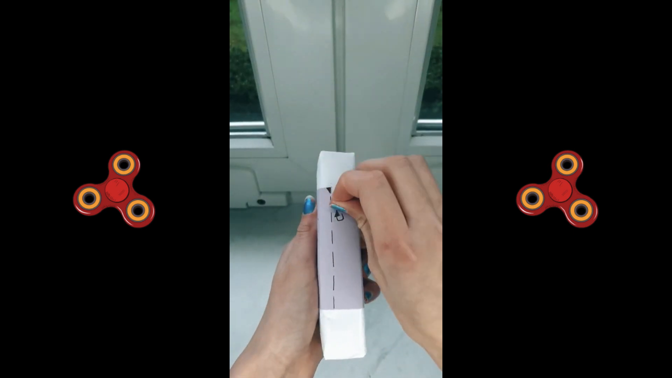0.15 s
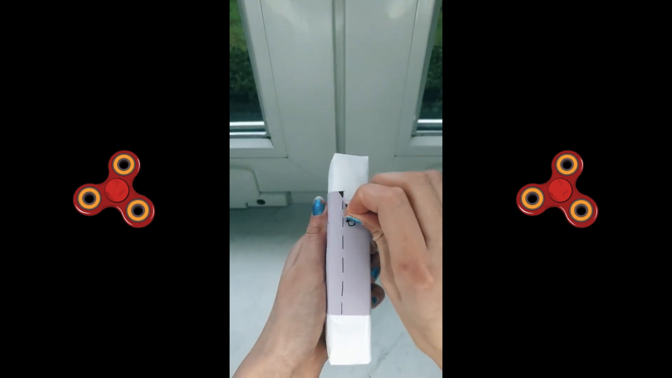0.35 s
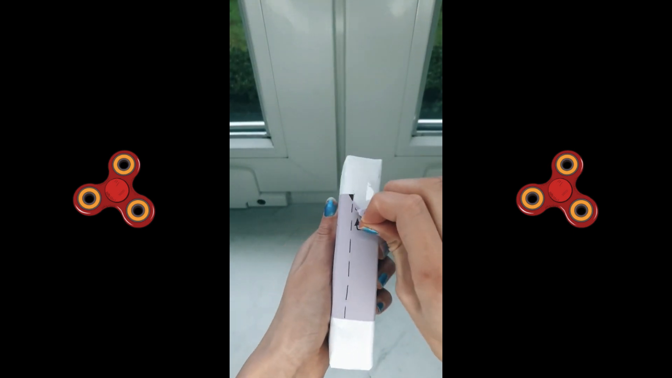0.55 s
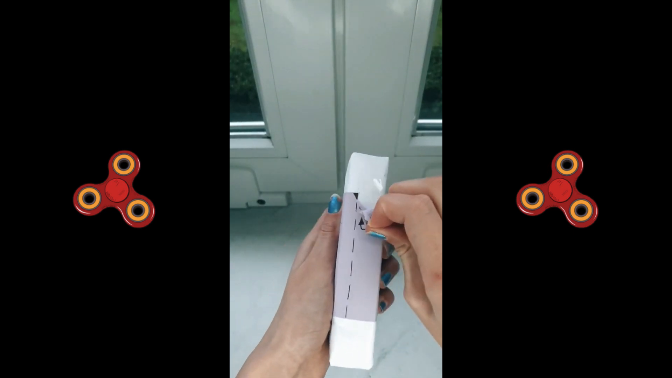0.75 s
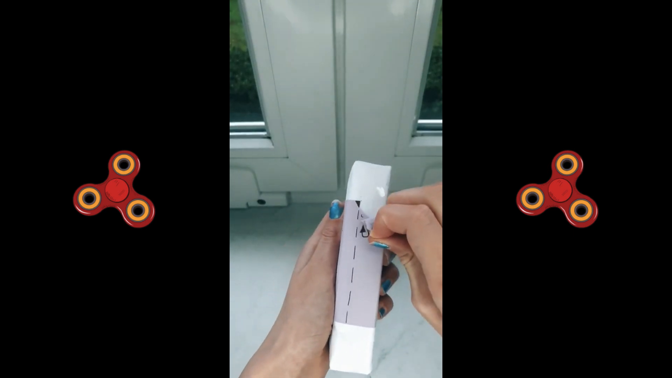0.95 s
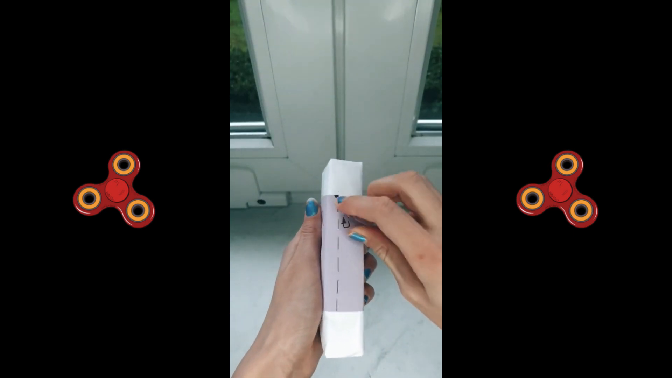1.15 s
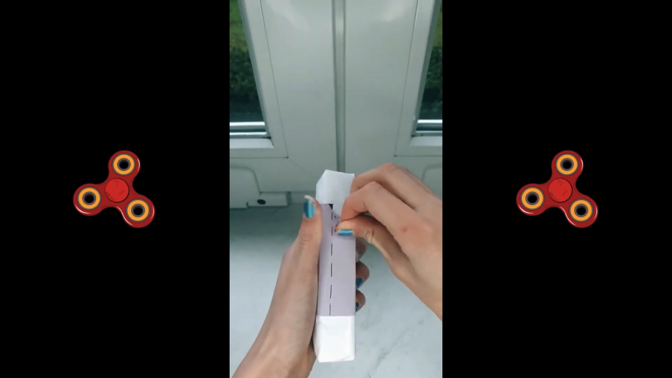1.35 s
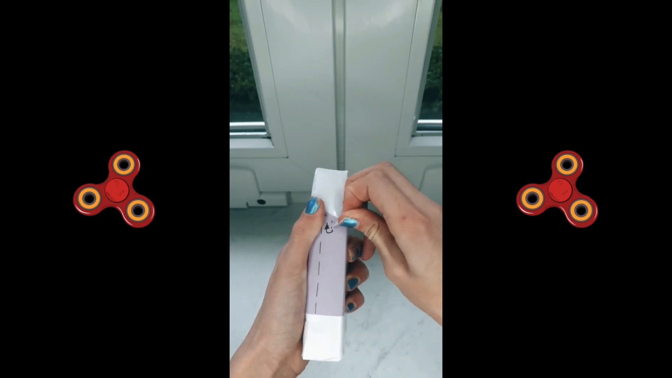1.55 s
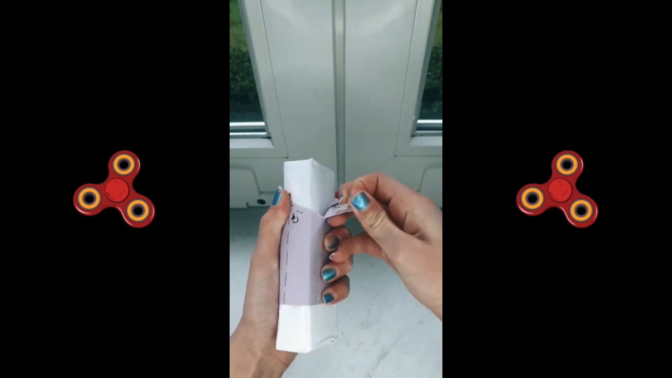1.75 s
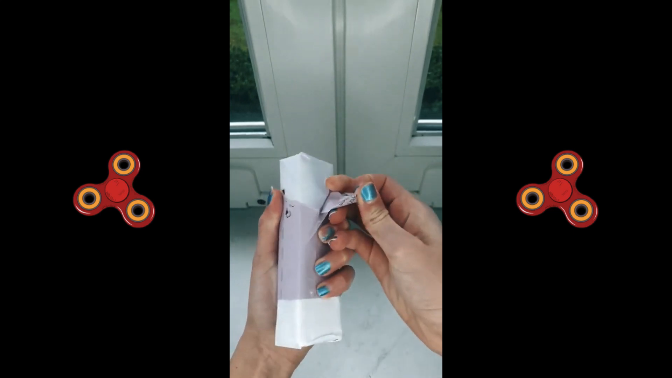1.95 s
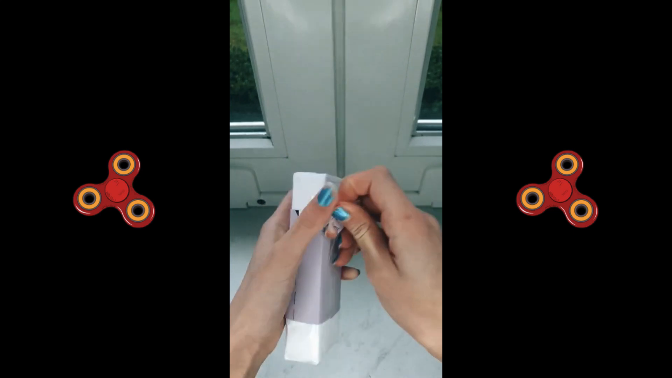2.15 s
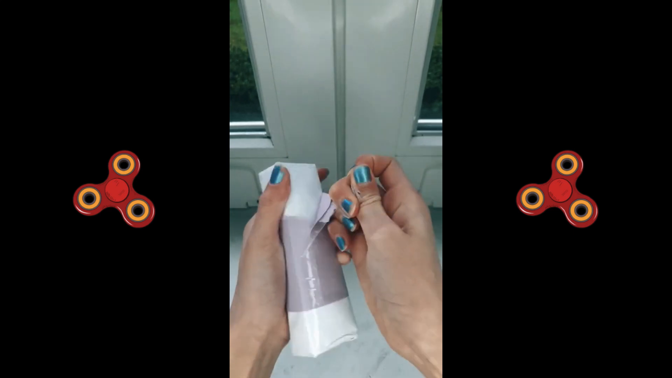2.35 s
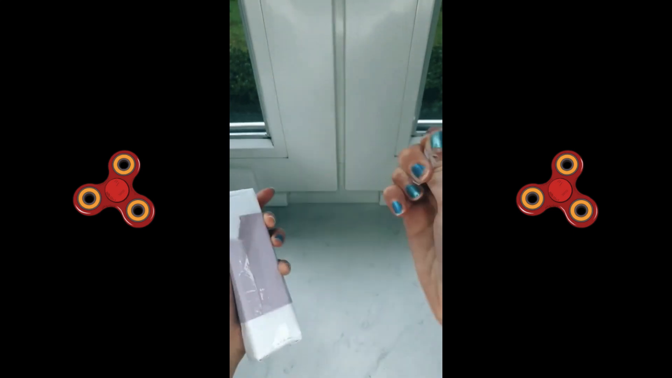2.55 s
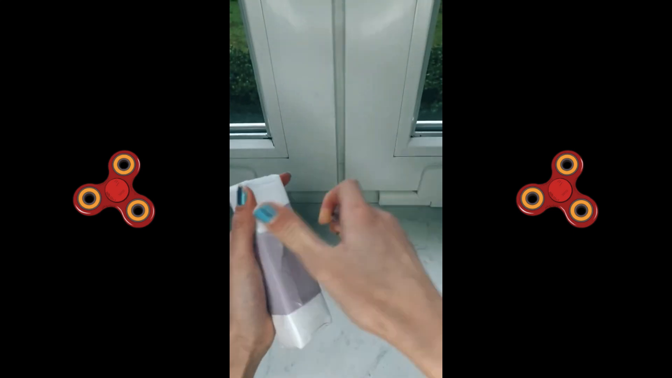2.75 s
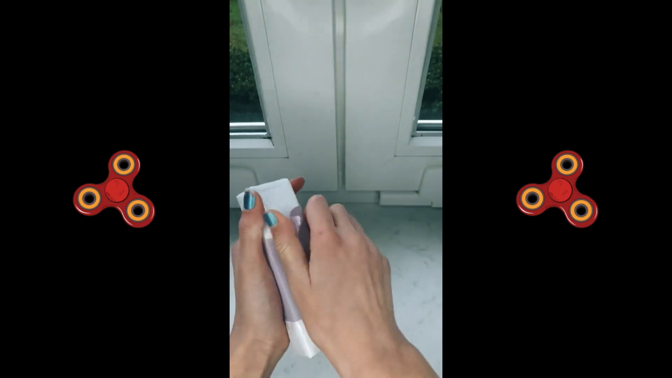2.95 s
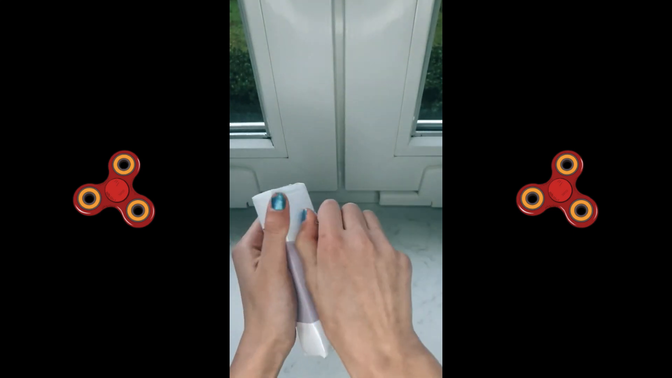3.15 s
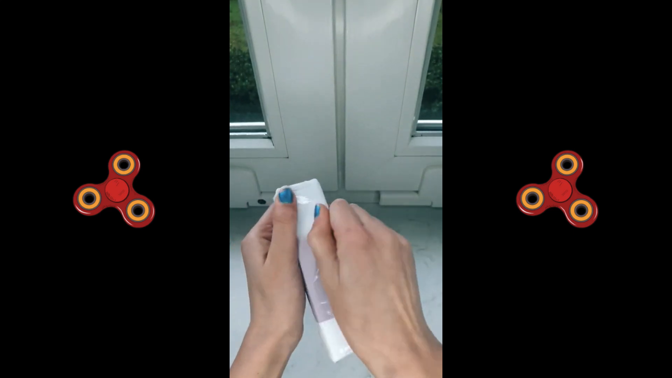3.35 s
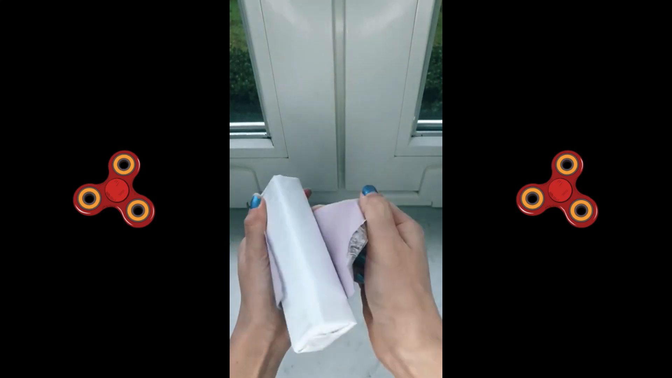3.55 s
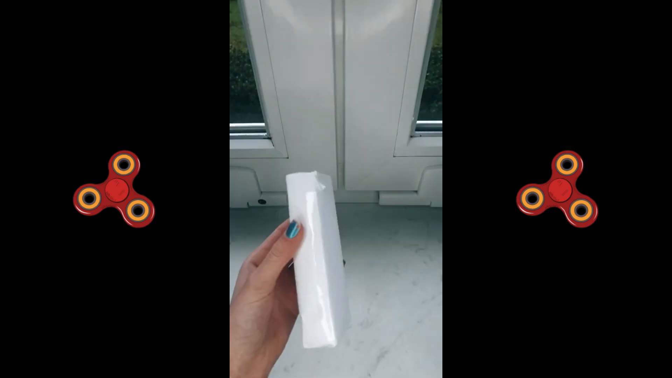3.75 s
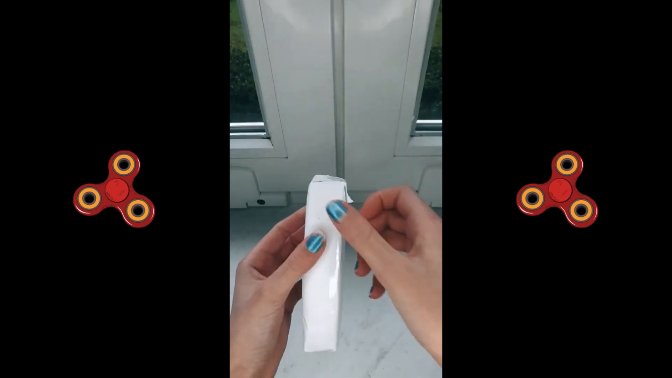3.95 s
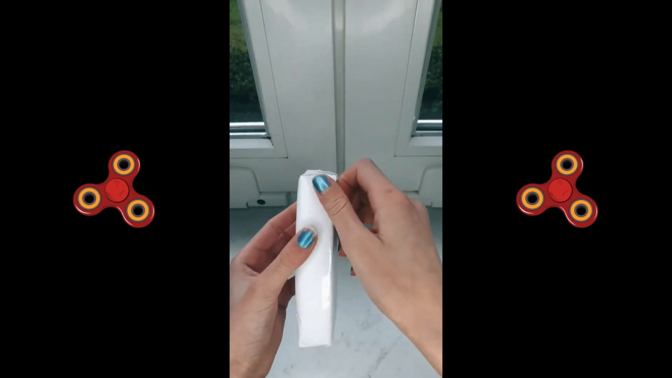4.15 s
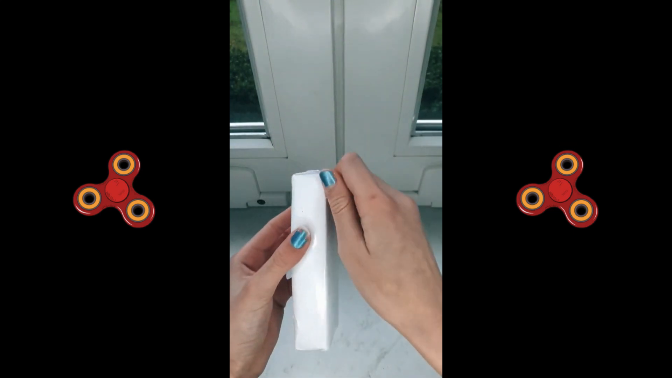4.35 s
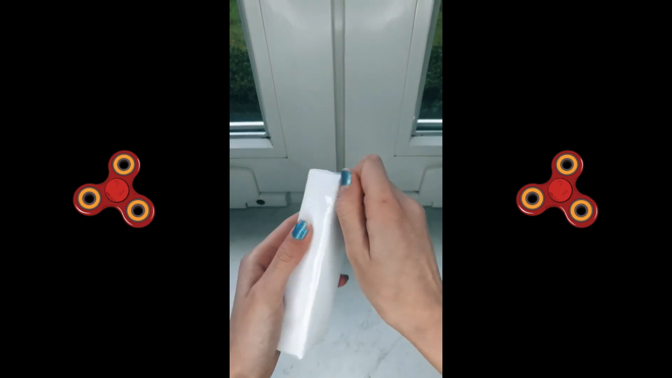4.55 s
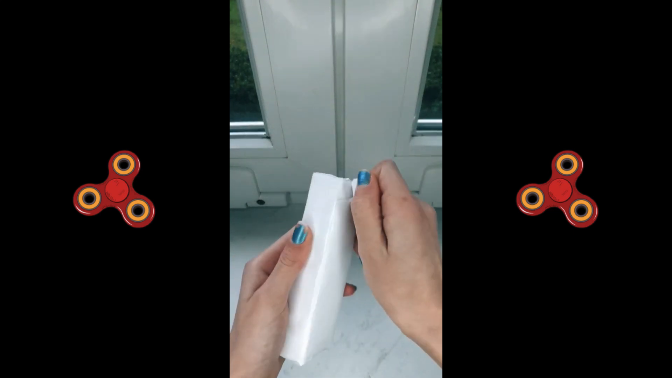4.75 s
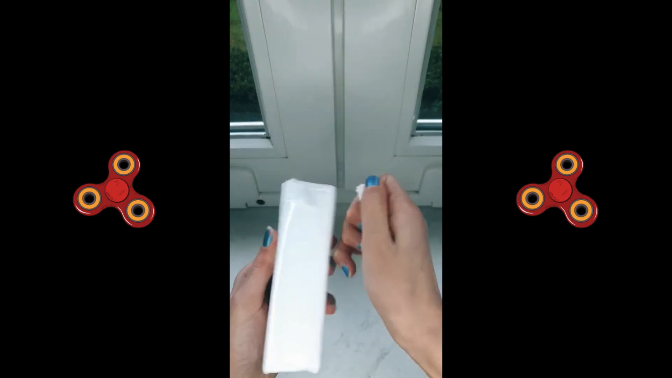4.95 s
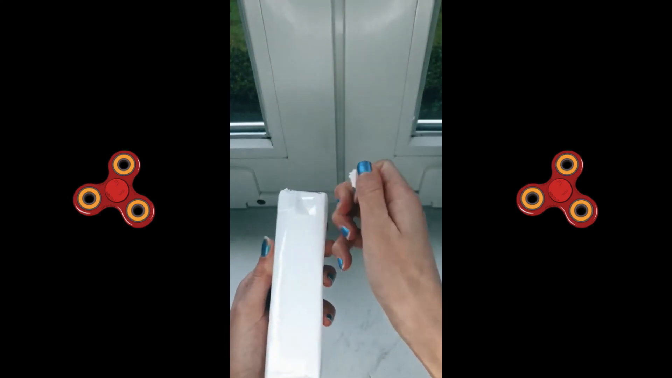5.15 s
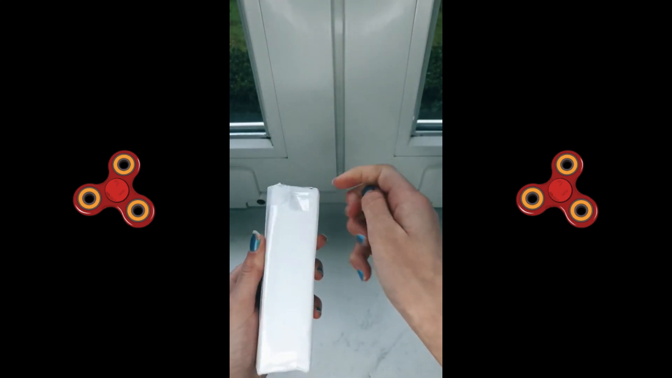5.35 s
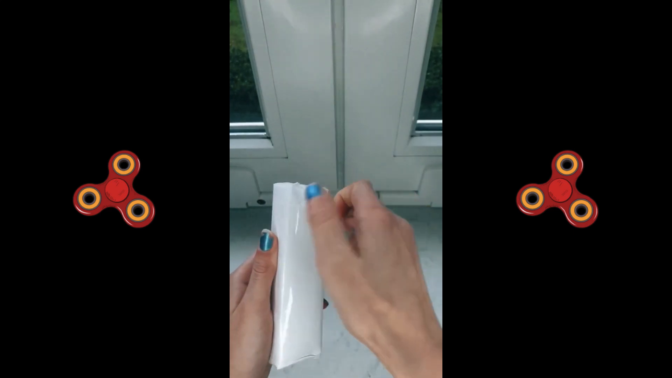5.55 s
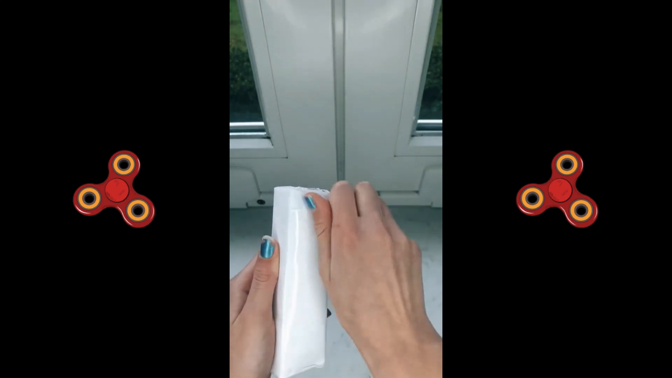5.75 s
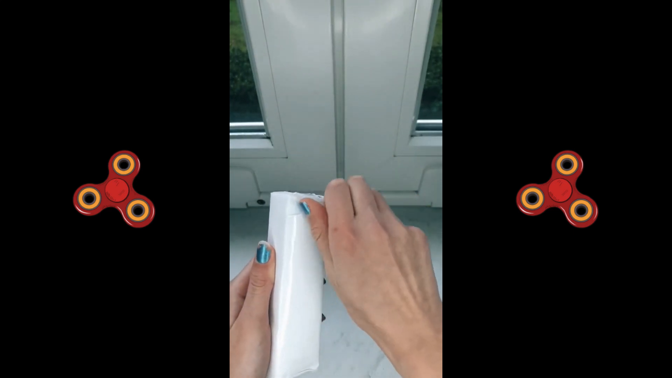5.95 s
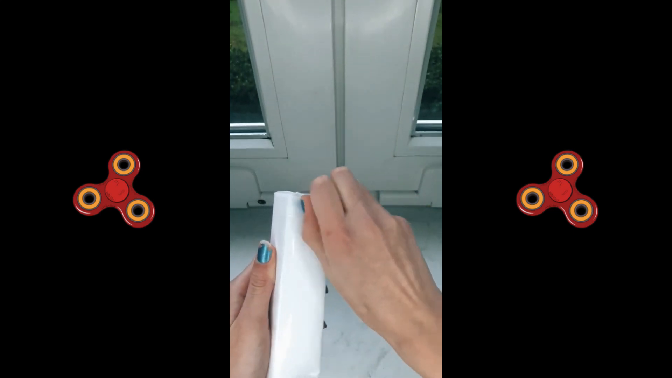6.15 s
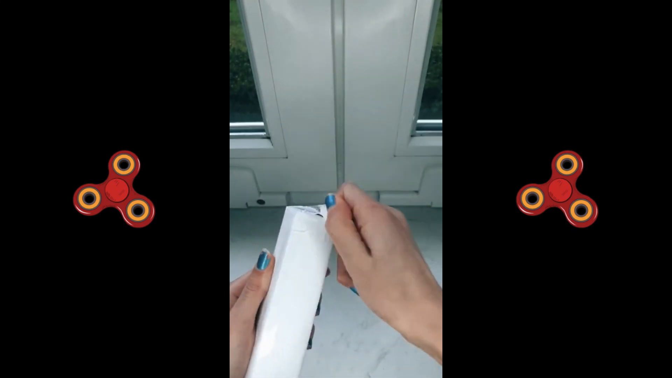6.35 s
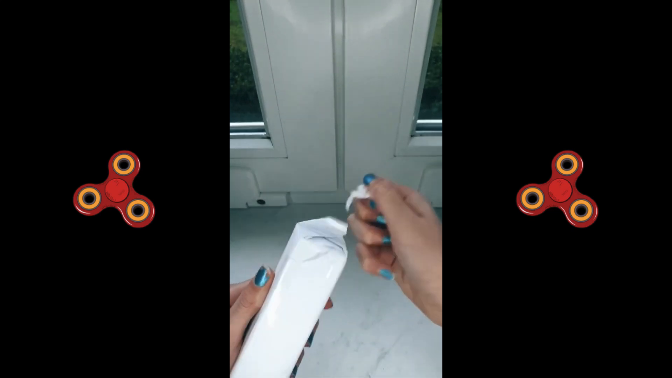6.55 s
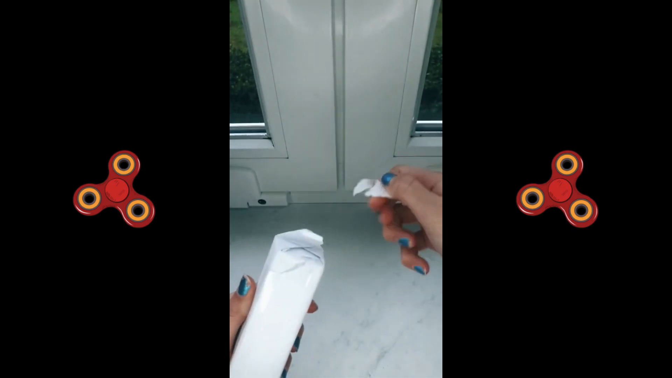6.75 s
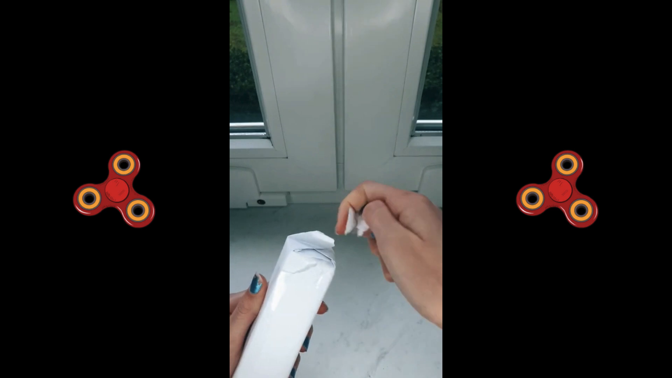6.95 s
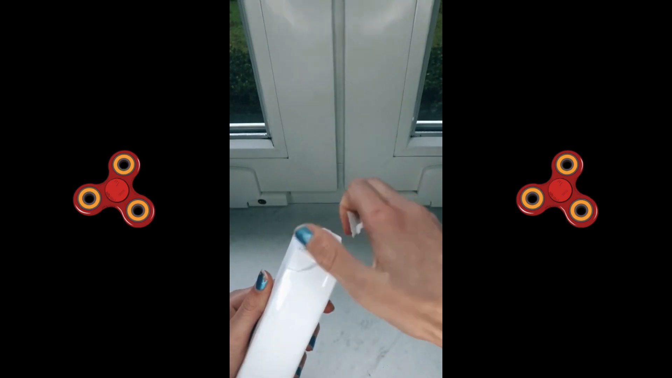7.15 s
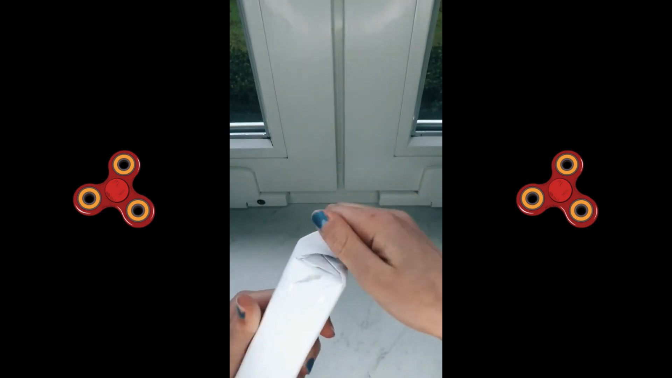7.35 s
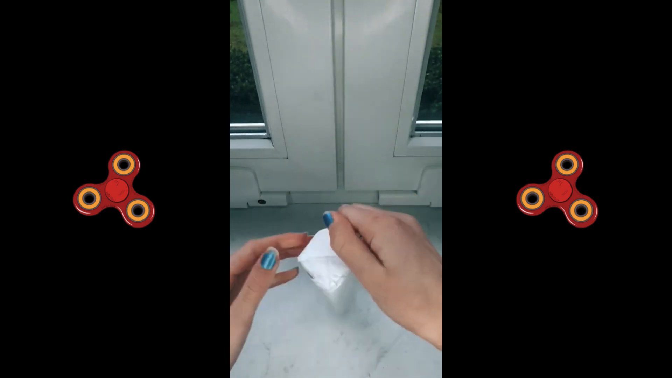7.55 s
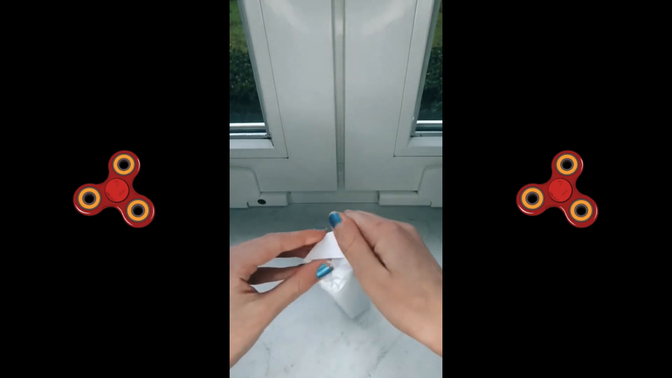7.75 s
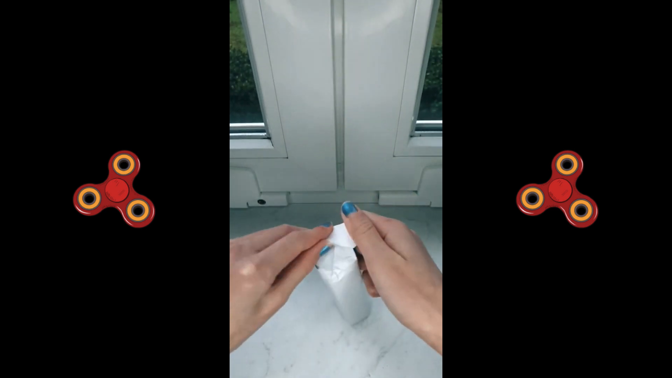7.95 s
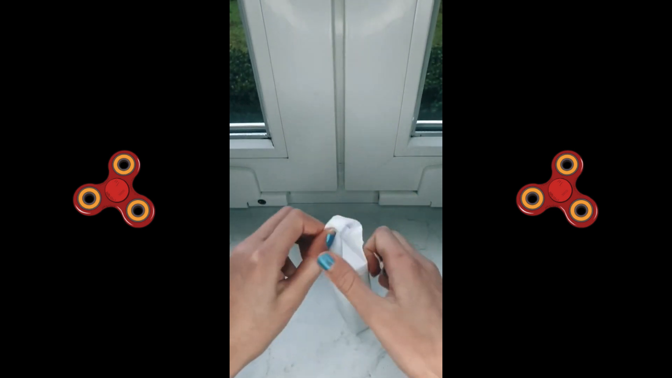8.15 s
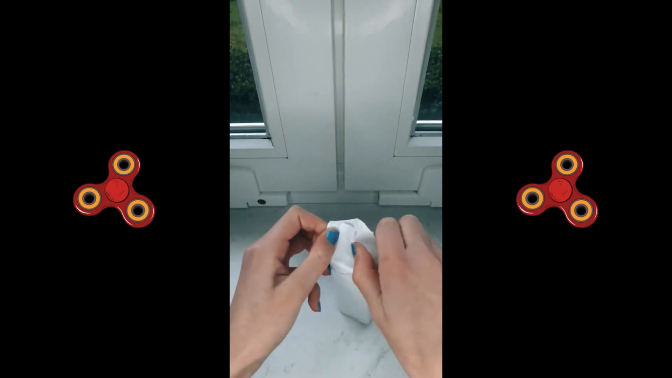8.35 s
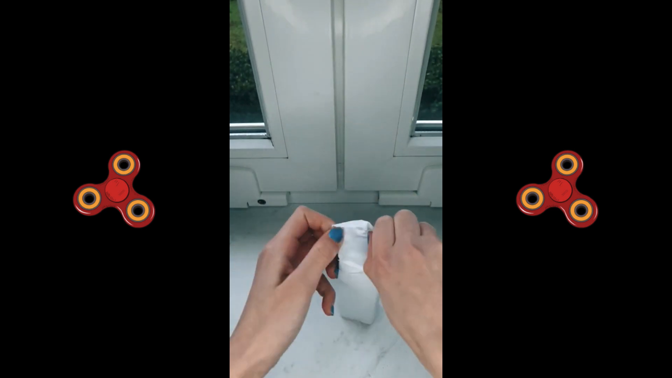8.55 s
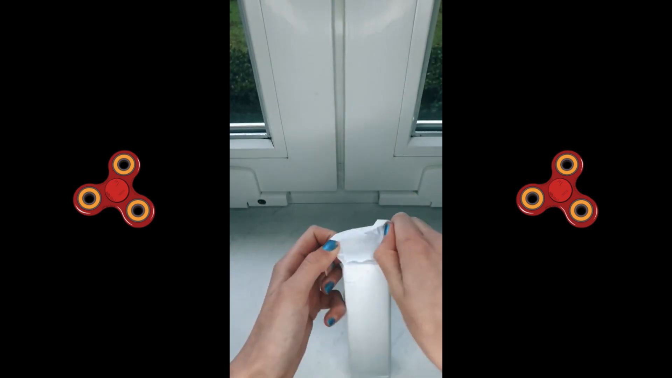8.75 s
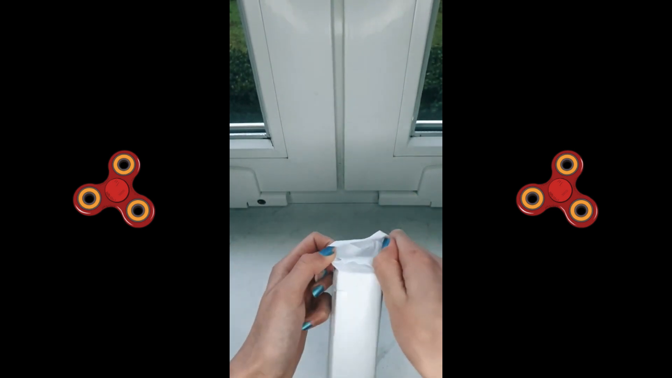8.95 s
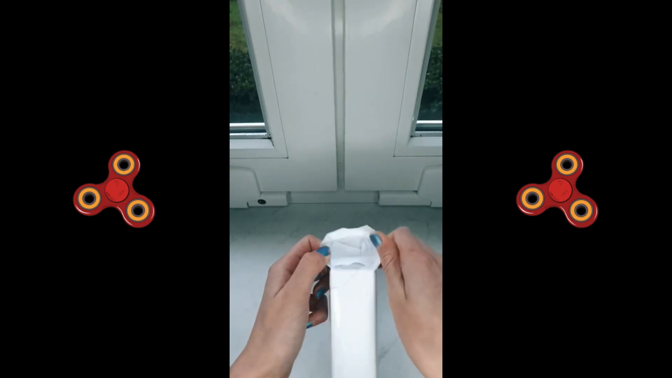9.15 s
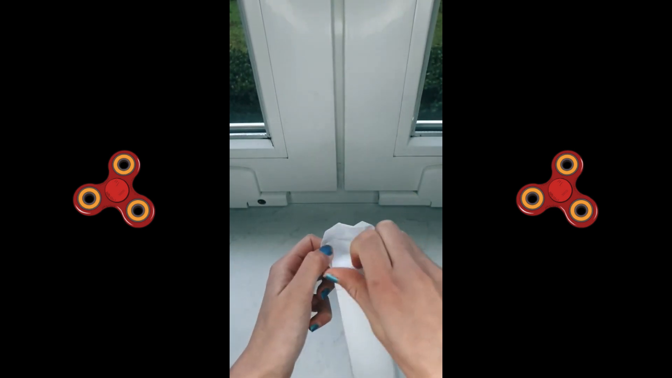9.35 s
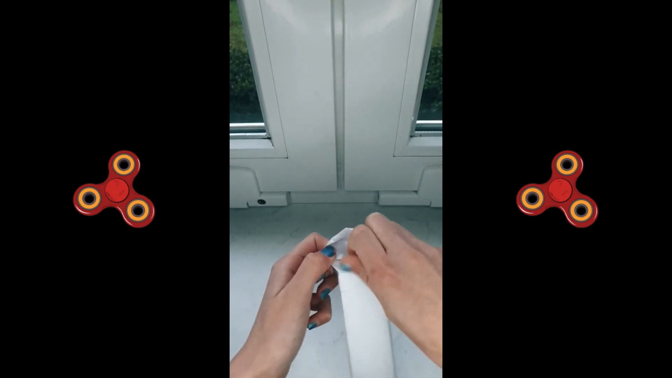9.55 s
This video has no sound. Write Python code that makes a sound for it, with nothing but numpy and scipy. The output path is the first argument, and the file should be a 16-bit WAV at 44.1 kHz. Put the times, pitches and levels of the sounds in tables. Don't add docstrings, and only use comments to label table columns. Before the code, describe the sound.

Irregular bursts of paper ripping, crinkling and hollow carton knocks in a small hard room, over faint traffic rumble, with one short near-silent gap.

```python
import sys
import numpy as np
from scipy import signal
from scipy.fft import rfft, irfft, next_fast_len
from scipy.io import wavfile
from scipy.ndimage import uniform_filter1d

SR = 44100
rng = np.random.default_rng(int(sys.argv[2]) if len(sys.argv) > 2 else 0)


def unload_wav(signal):
    wavfile.write(
        sys.argv[1],
        SR,
        np.round(np.clip(np.atleast_2d(signal).T, -1, 1) * 32767).astype(np.int16),
    )


def undo_db(level):
    steps = np.asarray(level, float) / 20
    return 10 ** steps


N = 422919

# pitch in Hz, width in Hz, level in dB
CARTON_TONES = [(323, 200, -7), (460, 71.6, 3), (634, 190, -5.5), (1295, 250, -0.5), (2300, 230, -6.5)]
SWING_DB = 30


def unit(x):
    return x / np.sqrt(np.mean(x ** 2))


def to_peak(x):
    return x / np.abs(x.mean(axis=0)).max()


def curves(table):
    s, *columns = np.transpose(table)
    return [np.interp(np.arange(N) / SR, s, c) for c in columns]


def band(x, lo_hz, hi_hz, order=2):
    limits = [lo_hz, min(hi_hz, .45 * SR)]
    return signal.sosfilt(signal.butter(order, limits, "band", fs=SR, output="sos"), x)


def ring(x, tones):
    total = 0
    for k, (hz, width, db) in enumerate(tones):
        total = total + (-1) ** k * undo_db(db) * band(x, hz - width / 2, hz + width / 2, order=1)
    return total


def colour(x, points):
    hz, db = np.transpose(points)
    size = next_fast_len(x.shape[-1], real=True)
    f = np.maximum(np.fft.rfftfreq(size, 1 / SR), 1)
    gain = undo_db(np.interp(np.log(f), np.log(hz), db))
    return irfft(rfft(x, size) * gain, size)[..., :x.shape[-1]]


def walk(rate):
    k = int(SR / rate)
    held = np.repeat(rng.standard_normal(N // k + 1), k)
    return unit(uniform_filter1d(held, k)[:N])


def pair(mid, side, width):
    return (mid + width * side * np.array([[1], [-1]])) / np.sqrt(1 + width ** 2)


def lean(pan_db):
    return np.array([[pan_db], [-pan_db]]) / 2


def outside():
    # time in seconds, rumble in dB, drone in dB
    street = [
        [(0.0, -72, -87.5), (3.57, -74, -80), (3.6, -82.5, -84)],
        [(3.9, -59, -58), (4.25, -57.5, -58), (4.55, -59.5, -68.5), (4.85, -62, -61.5), (5.3, -66, -69.5),
         (5.55, -62, -59), (5.85, -63, -68), (6.15, -68, -77.5)],
        [(6.3, -66.5, -77), (6.81, -73, -87.5), (9.59, -74, -81.5)],
    ]
    # pitch in Hz, level in dB per Hz
    hiss_tone = [(15, -30.5), (25, -9.5), (80, -3.5), (354, -19), (463, -18.5), (677, -23.5), (3250, -43),
                 (6560, -22.5), (9070, -37.5), (11300, -25.5), (16000, -29.5)]
    # pitch in Hz, level in dB
    motor = [(155, 3), (310, -18), (465, -13)]
    rumble_db, drone_db = curves(sum(street, []))
    noise = rng.standard_normal((4, N))
    rumble = pair(unit(band(noise[0], 43, 130)), unit(band(noise[1], 45, 115)), 0.17)
    rumble = rumble * undo_db(rumble_db + 0.7 * walk(5))

    turns = np.cumsum(1 + 0.007 * walk(11)) / SR
    drone = sum(undo_db(db + 2.5 * walk(22)) * np.sin(2 * np.pi * hz * turns) for hz, db in motor)
    haze = undo_db(-14) * unit(band(noise[0], 135, 185)) + undo_db(-19) * unit(band(noise[1], 420, 620))
    drone = drone + haze

    mid, side = colour(noise[2:], hiss_tone)
    floor = unit(pair(band(mid, 55, 16000), band(side, 500, 16000), 1.0)) * undo_db(-72.0)
    return rumble + drone * undo_db(drone_db + 0.6) + floor


def pulls():
    # peak time in seconds, crackle in dB, swell in seconds, fade in seconds, carton share in dB
    slides = [(.075, -41, 0.02, 0.081, -4), (.2, -65, 0.028, 0.33, -17), (.42, -52, 0.067, 0.31, -12),
              (.747, -70, 0.13, 0.085, -2), (.841, -68.5, 0.39, 0.095, -24),
              (1.552, -39.5, 0.27, 0.15, -2.5), (4.47, -61, 0.068, 0.17, -11),
              (4.774, -35.5, .03, .06, -12), (4.796, -35, 0.06, 0.07, -13), (4.841, -46, .01, .1, -15),
              (5.15, -67, 0.16, 0.045, -17), (5.25, -69.5, 0.036, .15, -8.5), (5.34, -72, 0.25, 0.14, -18),
              (5.871, -60.5, 0.15, 0.34, -11.5), (6.04, -56.5, 0.019, 0.34, -25),
              (6.687, -52.5, 0.071, 0.089, -24), (6.923, -61.5, 0.52, 0.06, -29)]
    # peak time in seconds, crackle in dB, swell in seconds, fade in seconds, carton share in dB
    tears = [(.332, -58, .3, .13, -7), (.461, -48.5, .06, .08, -17), (.53, -57, .03, .1, -18),
             (.962, -56.5, .022, .11, 0), (1.22, -46.5, .23, .065, -5), (2.005, -44, .14, .055, 0),
             (2.576, -52, .11, .14, -33), (2.835, -56, .05, .1, -20), (3.05, -51, .01, .15, -6),
             (3.076, -47, .06, .13, -8), (3.21, -43.5, .024, .2, 2), (3.251, -48, .06, .08, -12),
             (3.301, -43, .03, .15, -12), (3.4275, -29.5, .025, .01, -8), (4.55, -32.5, .008, .054, -19),
             (4.57, -49.5, .022, .15, -11), (5.5135, -57, .005, .3, -13), (6.026, -59.5, .01, .2, -24),
             (6.433, -24.5, .05, .02, -19), (6.49, -59, .018, .15, -29.5), (7.106, -48.5, .02, .2, -15),
             (7.1225, -35, .045, .03, -17), (7.917, -45, .16, .15, -8), (7.95, -46, .03, .08, -9),
             (8.05, -53, .05, .15, -14), (8.565, -36.5, .21, .091, -11), (8.68, -46, .33, .17, -8),
             (9.0, -38.5, .093, .15, -11), (9.589, -35, .25, .059, -10.5)]
    # peak time in seconds, crackle in dB, swell in seconds, fade in seconds, carton share in dB
    crushes = [(1.067, -58, 0.014, 0.34, -0.5), (1.28, -48, 0.02, 0.072, -15),
               (2.27, -26, 0.055, 0.081, -11.5), (2.348, -31, 0.016, 0.1, -1.5),
               (2.965, -46.5, .09, 0.1, -11.5), (3.155, -41.5, 0.025, 0.079, 4.5),
               (3.433, -27.5, 0.029, 0.14, -1), (4.87, -31.5, 0.047, 0.094, -5),
               (7.261, -46, .015, .08, -6), (7.291, -53, 0.03, 0.16, 4), (7.371, -60, .05, .12, -9),
               (7.743, -48, .01, 0.33, -10.5), (8.345, -37, 0.045, 0.082, -10.5),
               (8.46, -29, 0.013, 0.088, -13.5), (9.445, -30.5, 0.0096, 0.049, -5.5)]
    # start in seconds, hold in seconds, crackle in dB, carton share in dB, sheen share in dB
    drags = [(1.399, 0.185, -44, -12, -9), (1.69, 0.25, -46, -17, 0), (2.044, 0.2, -58, -3, 4),
             (2.75, 0.16, -59, -7, 3), (3.335, 0.1, -38, -9, -0.5), (3.45, 0.046, -39, 1, -4),
             (3.529, 0.087, -51, -1.5, -0.5), (3.95, 0.26, -75.5, -3, -1), (4.132, 0.28, -65, -4, -1),
             (4.661, 0.14, -61, -22, 11), (5.57, 0.15, -55, -4, -1), (6.079, 0.255, -43, -18, 6.5),
             (6.365, 0.073, -28, -13, 2.5), (7.527, .18, -68, -12, 2), (8.007, 0.14, -52.5, -9, -2),
             (8.184, 0.11, -57, -9, -1), (8.816, 0.22, -58, -7.5, 1), (9.259, 0.062, -42, -5, -9),
             (9.376, 0.06, -57, -8, -8)]
    # crackle in dB, carton in dB, sheen in dB
    rest_db = [-83.5, -82, -90]
    drag_swell_s, drag_fade_s, sag_db_per_s = 0.036, 0.053, 13
    carton_steep, sheen_steep = 0.98, 1.22

    rows = []
    for table, sheen_db in [(slides, 9.5), (tears, 0.7), (crushes, -3.5)]:
        rows += [(s, 0, db, swell, fade, carton, sheen_db) for s, db, swell, fade, carton in table]
    rows += [(s, hold, db, drag_swell_s, drag_fade_s, carton, sheen) for s, hold, db, carton, sheen in drags]
    s, hold, db, swell, fade, carton, sheen = np.transpose(rows)[:, :, None]

    t = np.arange(0, N / SR + .002, .001)
    drop_db = SWING_DB * (np.maximum(s - t, 0) / swell + np.maximum(t - s - hold, 0) / fade)
    db = db - sag_db_per_s * (np.clip(t - s, 0, hold) - hold / 2)
    layers = db - drop_db, db + carton - carton_steep * drop_db, db + sheen - sheen_steep * drop_db
    total = [10 * np.log10(np.sum(undo_db(2 * x), axis=0) + undo_db(2 * rest)) for x, rest in zip(layers, rest_db)]
    return curves(np.transpose([t] + total))


def fibres(per_s, spread_db, smear_ms):
    sizes = undo_db(spread_db * np.minimum(rng.exponential(size=N), 5))
    hits = (rng.random(N) < per_s / SR) * sizes
    return signal.lfilter([1], [1, -np.exp(-1000 / (smear_ms * SR))], hits)


def bend_modes(paper, depth_db, frames=12):
    f, _, z = signal.stft(paper, SR, nperseg=512)
    count = z.shape[-1]
    bends = np.repeat(rng.standard_normal((len(f), count // frames + 1)), frames, axis=1)
    bends = uniform_filter1d(bends, 2, axis=0)
    bends = unit(uniform_filter1d(bends, frames // 2, axis=1))[:, :count]
    return signal.istft(z * undo_db(depth_db * bends), SR, nperseg=512)[1][:, :N]


def sheet_patches(paper, sheet_db, carton_db, sheen_db):
    size = next_fast_len(N, real=True)
    spectrum = rfft(bend_modes(paper, depth_db=3.0), size)
    octave = np.log2(np.fft.rfftfreq(size, 1 / SR) + 1)
    out = 0
    for hz in 1300 * 2 ** np.arange(0, 4, .5):
        patch = np.clip(1 - 2 * np.abs(octave - np.log2(hz)), 0, 1)
        mid, side = irfft(spectrum * patch, size)[:, :N]
        thin = np.clip(np.log2(hz / 5600), 0, 1)
        glued = np.clip(.5 * np.log2(4000 / hz), 0, .55)
        level_db = (1 - thin - glued) * sheet_db + thin * sheen_db + glued * (carton_db + 6.0)
        shifting_db = 1.7 * walk(20) + 1.6 * walk(120)
        out = out + pair(mid, side, 0.73 + 0.03 * thin) * undo_db(level_db + shifting_db)
    return out


def panels(sheet):
    # start in seconds, hold in seconds, level in dB, pitch in Hz, left minus right in dB
    rubs = [(.066, .022, -48, 1300, 0), (.954, .04, -62.5, 1200, 0), (1.041, .025, -74.5, 1200, 2),
            (1.191, .055, -63, 1300, 2), (1.476, .095, -48, 1260, 2), (1.481, .08, -49.5, 3400, 0),
            (1.666, .125, -62.5, 1300, 2), (1.681, .13, -54.5, 5500, 0), (1.971, .03, -49.5, 1290, 3),
            (2.351, .04, -41.5, 5100, -2), (2.761, .04, -61.5, 450, 0), (3.051, .045, -57.5, 450, 0),
            (3.361, .04, -54.5, 450, 0), (3.4315, .006, -30, 1250, 3), (3.471, .018, -44, 1900, 2),
            (4.5525, .008, -47.5, 2300, 0), (4.771, .028, -46, 1300, 2), (4.976, .05, -60.5, 500, 0),
            (6.071, .08, -52.5, 5600, -2), (6.139, .02, -44.5, 10300, 0), (7.2565, .008, -47.5, 1250, 3),
            (7.287, .065, -59, 1260, 2), (7.288, .07, -63.5, 450, 0), (7.881, .04, -58.5, 470, -2),
            (8.096, .02, -63.5, 1600, 0), (8.198, .02, -59.5, 450, -2), (8.333, .03, -47.5, 2000, -2),
            (8.461, .015, -45.5, 1200, -2), (8.501, .09, -55.5, 2050, -2), (8.981, .035, -50.5, 2400, -2),
            (9.256, .04, -54.5, 2300, 0), (9.516, .035, -48.5, 2300, -2)]
    swell_s, fade_s, width = .012, .04, 0.093
    out, t = np.zeros((2, N)), np.arange(N) / SR
    for s, hold, db, hz, pan_db in rubs:
        span = slice(int((s - .05) * SR), int((s + hold + .15) * SR))
        before, after = np.maximum(s - t[span], 0), np.maximum(t[span] - s - hold, 0)
        drop_db = SWING_DB * (before / swell_s + after / fade_s)
        mid, side = band(sheet[:, span], hz / (1 + width), hz * (1 + width), order=1)
        out[:, span] += pair(unit(mid), unit(side), 0.31) * undo_db(db - drop_db + lean(pan_db))
    return out


def crackle():
    # pitch in Hz, level in dB per Hz
    paper_tone = [(300, -3), (1250, 2.5), (1750, -4), (2300, -2), (3300, -1), (5500, 2), (8000, -1),
                  (11000, -2.5), (14000, -3), (16000, -9), (16600, -24.5)]
    sheet_db, carton_db, sheen_db = pulls()
    fine = fibres(per_s=3200.0, spread_db=2.5, smear_ms=0.45)
    coarse = fibres(per_s=300.0, spread_db=4.5, smear_ms=1.5)
    paper = colour((fine + 0.31 * coarse) * rng.standard_normal((2, N)), paper_tone)
    paper = paper / np.sqrt(np.mean(band(paper[0], 2000, 8500) ** 2))
    patches = sheet_patches(paper, sheet_db, carton_db, sheen_db)

    jolts = paper * unit(1.0 + fibres(per_s=90.0, spread_db=3.0, smear_ms=8.4))
    hollow = 0
    for k, tone in enumerate(CARTON_TONES):
        hollow = hollow + ring(jolts, [tone]) * (-1) ** k * undo_db(1.8 * walk(18))
    mid, side = hollow
    carton = pair(unit(mid), unit(band(side, 450, 3000, order=3)), 0.67)
    singing = panels(band(paper + .5 * jolts, 300, 14000))
    return undo_db(-1.6) * patches + undo_db(carton_db - .6) * carton + singing


def snaps():
    # time in seconds, peak in dB, ring in Hz, left minus right in dB
    cracks = [
        (2.2342, -27.5, 6420, 0.5),
        (2.3465, -1.5, 4310, -5),
        (4.862, -5, 8950, -1),
        (5.686, -21.5, 2490, -5),
        (6.3618, -26.5, 4740, -3),
        (8.1958, -32.5, 2450, -3),
        (8.306, -35, 5670, -5),
    ]
    # time in seconds, peak in dB, ring in Hz, left minus right in dB
    flicks = [(.3209, -24.5, 6550, 0), (.3841, -30, 6800, 3), (.5346, -34.5, 11100, 5),
              (1.6769, -23, 5940, -4), (1.7848, -29, 5400, 0), (3.149, -26, 4000, 0), (5.474, -55, 5000, 0),
              (3.063, -33, 3500, 0), (2.2116, -27, 5940, -2.5), (2.9406, -19, 10600, 0),
              (2.9674, -26.5, 2300, 0), (3.0605, -38, 2444, -8.5), (4.663, -38, 5450, -6.5),
              (4.7357, -24.5, 10100, 2), (4.769, -18, 12000, 2), (5.5705, -46, 11000, 2.5),
              (6.6784, -37.5, 12200, -1.5), (7.1024, -33, 8260, -4), (8.11, -20.5, 4810, -2),
              (8.33, -23, 2523, -2), (8.976, -30.5, 2480, -13), (8.3394, -14, 3890, -2),
              (4.552, -34, 2300, 12.5), (9.5182, -28, 2280, -4), (5.252, -40, 10700, -1.5),
              (.582, -35, 6900, 5), (.827, -38, 9000, 3), (3.93, -55, 6000, -1), (4.852, -25, 5800, -1)]
    # time in seconds, peak in dB, ring in Hz, left minus right in dB
    rips = [(.0669, -24, 7540, -6), (.1967, -35.5, 7130, 2), (.4224, -33, 6840, 3), (.748, -37.5, 6300, 0),
            (1.8282, -33.5, 3380, 9), (2.246, -24.5, 3940, -8.5), (2.864, -27.5, 7900, 1),
            (3.1556, -17.5, 5000, -3.5), (4.4677, -33.5, 6400, -4), (4.5506, -23, 5880, -3),
            (5.8544, -34, 10440, -4), (6.0785, -30, 5730, -6.5), (6.421, -11, 8340, -5),
            (7.1215, -23, 5440, -4), (7.7448, -33, 6160, -2), (8.4568, -11, 2130, -6.5),
            (9.3099, -18, 2280, 1), (9.4443, -6.5, 12800, 2)]
    # time in seconds, peak in dB, ring in Hz, left minus right in dB
    folds = [(1.3932, -31, 4650, 0), (1.5254, -22, 5640, -1), (1.5347, -17, 6160, -2),
             (1.5552, -19.5, 6310, -4), (2.1928, -39, 2440, 0.5), (2.2615, -17, 5200, 3),
             (3.1438, -29.5, 2300, 2.5), (3.3243, -24, 4700, -7.5), (3.431, -5.5, 5530, -4),
             (3.484, -19.5, 2250, 16.5), (5.5122, -41, 5760, 0), (6.3834, -12, 7970, -2),
             (9.0998, -32.5, 2380, -7)]
    # time in seconds, peak in dB, ring in Hz, left minus right in dB
    seams = [(1.072, -33, 5600, 2), (1.277, -34.5, 5850, -3), (1.3616, -27, 2000, 2.5),
             (1.9869, -30.5, 2320, -1), (2.1461, -31.5, 3900, -5), (3.05, -35.5, 2440, -1),
             (3.0804, -28, 7000, -2), (3.2018, -12, 3060, -1), (4.9756, -38, 1500, 5),
             (1.7852, -33, 1300, 0), (7.2554, -29, 2477, -0.5), (8.6399, -28, 2310, -5),
             (9.2503, -33.5, 2380, -.5), (.708, -53, 2000, -3), (1.931, -44.5, 1500, -1),
             (1.952, -41, 2000, -7), (5.625, -34, 1500, -2), (6.171, -31.5, 1500, 2),
             (6.252, -40.5, 3000, -2), (6.776, -51, 1300, 5), (7.972, -37.5, 1200, 2),
             (8.587, -29, 1500, 0), (3.311, -25.5, 1490, 0), (6.703, -55, 1490, 0), (2.763, -41, 1500, 2.5)]
    # time in seconds, peak in dB, ring in Hz, left minus right in dB
    strands = [(0.299, -29, 6110, -1.0), (0.4604, -37, 10300, 1.0), (1.486, -27, 3590, -0.5),
               (1.7278, -31, 6350, 0.0), (1.7446, -31, 5310, 0.5), (1.7644, -28, 5240, -0.5),
               (1.8976, -39, 5540, 0.0), (2.2814, -24, 6690, 0.0), (2.319, -27, 4730, 1.0),
               (3.2964, -28, 4900, -0.5), (3.4564, -19, 5630, 0.5), (5.9494, -46.5, 5560, -0.5),
               (6.0342, -40, 11500, -1.5), (6.1384, -24.5, 10900, -1.0), (6.1544, -23, 11400, 0.0),
               (6.229, -24, 11900, -1.5), (6.2914, -31, 11200, -0.5), (6.4367, -14, 5780, 0.0),
               (8.5375, -24, 8490, 0.0), (8.729, -37.5, 2990, -1.0), (8.8074, -45, 6720, -1.0)]
    # time in seconds, peak in dB, ring in Hz, left minus right in dB
    nicks = [
        (2.101, -50, 1220, 1.5),
        (3.259, -35, 1170, -1.5),
        (3.47, -18.5, 1920, 3),
        (7.286, -38.5, 2210, 1.0),
        (7.294, -39, 1210, 0.5),
        (7.314, -36, 1300, -0.5),
        (8.117, -43, 1730, 0.0),
        (8.417, -45, 1300, -1.5),
    ]
    # its table, carton share in dB, length in ms
    kinds = [(cracks, -11, 1.05), (flicks, -30, 2.3), (rips, -30, 4.5), (folds, -10, 4.5),
             (seams, -2.5, 2.8), (strands, -25, 1.2), (nicks, -2, 2.5)]
    size, lead = 2600, 220
    rows = [(*row, *kind) for table, *kind in kinds for row in table]
    s, peak_db, ring_hz, pan_db, carton_db, ms = np.transpose(rows)

    t = (np.arange(size) - lead) * 1000 / SR
    mid, side, knock = rng.standard_normal((len(s), 3, 1, size)).transpose(1, 0, 2, 3)
    creak = .1 * np.exp(t / 1.5) * (t < 0)
    buckle = np.clip(t / .2, 0, 1) * np.exp(-np.abs(t) / np.maximum(ms, .3)[:, None, None])
    shape = creak + buckle
    burst = pair(mid, side, 0.2) * shape
    broad = band(burst, 1900, 13000, order=1)
    carton = ring(pair(knock, band(side, 470, 3000, order=3), 0.49) * shape, CARTON_TONES)

    out = np.zeros((2, N + size))
    for k, hz in enumerate(ring_hz):
        sheet = broad[k] + 5.5 * band(burst[k], hz * 0.84, hz * 1.26, order=1)
        both = to_peak(sheet) + undo_db(carton_db[k]) * to_peak(carton[k])
        i = int(s[k] * SR) - lead
        out[:, i:i + size] += both * undo_db(peak_db[k] - 3.0 + lean(pan_db[k]))
    return out[:, :N]


def room(dry):
    # pitch in Hz, time to die by 60 dB in seconds
    echo_times = [(400, 0.32), (1500, 0.21), (5000, 0.17), (12000, 0.096)]
    t = np.arange(SR // 2) / SR
    mid, side = rng.standard_normal((2, len(t))) * np.minimum(t / 0.003, 1)
    tail = 0
    for hz, t60 in echo_times:
        part = band(pair(mid, side, min(hz / 3500, 1)), hz / 1.9, hz * 1.9)
        tail = tail + part * np.exp(-np.log(1000) * t / t60) / np.sqrt(t60)
    tail = undo_db(-11) * tail / np.sqrt(np.sum(tail ** 2) / 2)
    return signal.fftconvolve(dry.mean(axis=0)[None], tail, axes=1)[:, :N]


def knocks(table, cycles):
    out, age = np.zeros(N), np.arange(SR // 4) / SR
    for s, peak_db, hz in table:
        turns = hz * age / cycles
        i = int(s * SR)
        out[i:i + len(age)] += undo_db(peak_db + 3.5) * turns * np.exp(-turns) * np.sin(2 * np.pi * hz * age)
    return out


def taps():
    # time in seconds, peak in dB, pitch in Hz
    touches = [
        (0.969, -41, 1080),
        (3.925, -59, 334),
        (4.146, -39, 1200),
        (5.624, -36, 345),
        (7.158, -47, 451),
        (7.823, -44.5, 500),
        (7.662, -45, 440.2),
        (8.637, -33, 567),
        (9.098, -48, 573),
    ]
    return knocks(touches, cycles=1.0)


def thumps():
    # time in seconds, peak in dB, pitch in Hz
    palm_hits = [
        (1.068, -40.5, 296),
        (1.362, -41, 315),
        (2.345, -39, 305),
        (3.199, -38, 291),
        (3.429, -42, 236),
        (4.86, -45, 296),
        (6.382, -40.5, 297.4),
        (7.255, -43.5, 294),
    ]
    return knocks(palm_hits, cycles=0.97)


def shakes():
    # time in seconds, level in dB, fade in seconds, top pitch in Hz
    jerks = [(1.066, -53, .33, 260), (1.366, -60.5, .25, 220), (2.348, -50, .3, 240), (3.15, -59, .4, 240),
             (3.431, -57.5, .4, 160), (4.571, -61, .4, 85), (4.766, -56.5, .2, 250),
             (4.876, -50.5, .28, 250), (4.991, -59, .18, 250), (6.081, -63.5, .2, 100),
             (6.401, -62.5, .3, 110), (7.291, -64.5, .3, 300)]
    out, age = np.zeros(N), np.arange(SR // 3) / SR
    for (s, db, fade, top_hz), noise in zip(jerks, rng.standard_normal((len(jerks), len(age)))):
        i = int(s * SR)
        swell = np.minimum(age / .006, 1)
        out[i:i + len(age)] += unit(band(noise, 45, top_hz)) * swell * undo_db(db - SWING_DB * age / fade)
    return out


def ticks():
    # time in seconds, peak in dB, pitch in Hz
    touches = [
        (3.689, -68.5, 150),
        (3.711, -62.5, 151),
        (3.799, -68.5, 120.4),
        (3.826, -70.5, 150),
    ]
    return knocks(touches, cycles=.25)


def scene():
    # time in seconds, level in dB
    fade = [(0, -2), (3.63, 0), (3.66, -36), (3.7, -47.5), (3.8, -36.5), (3.875, 1), (9.6, 0)]
    paper = crackle() + snaps() + taps()
    faded = (paper + room(paper) + outside()) * undo_db(curves(fade)[0])
    return faded + thumps() + shakes() + ticks()


def low_pass(x):
    return signal.sosfilt(signal.butter(12, 17000, fs=SR, output="sos"), x)


def record(dry):
    lowpass = signal.ellip(8, .2, 40, 16000, fs=SR, output="sos")
    mix = signal.sosfilt(lowpass, dry)
    return low_pass(mix)


dry = scene()
out = record(dry)
unload_wav(out)
```